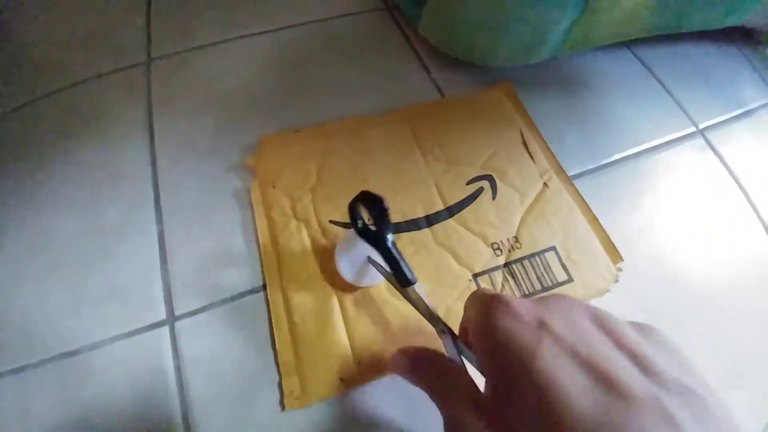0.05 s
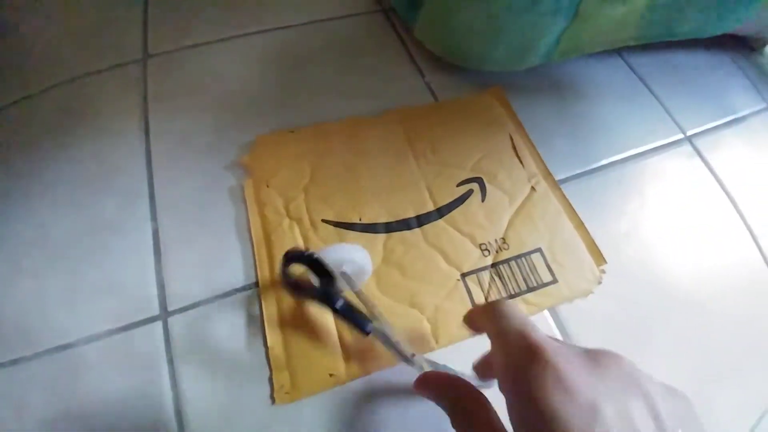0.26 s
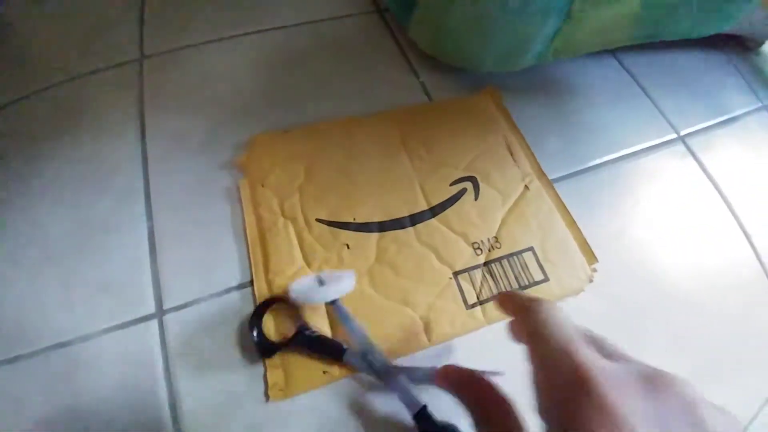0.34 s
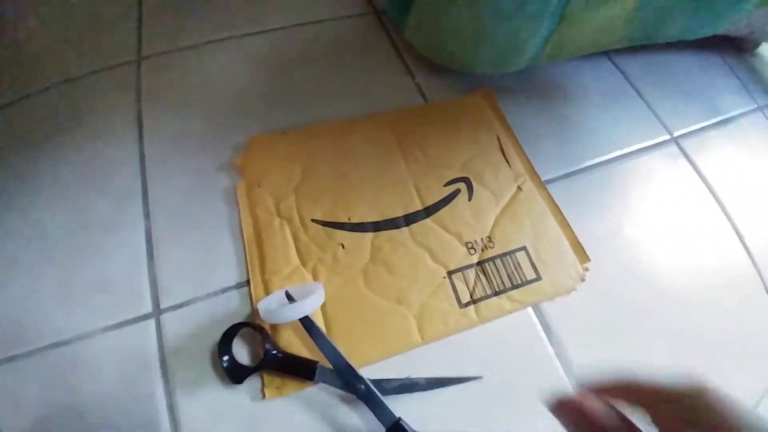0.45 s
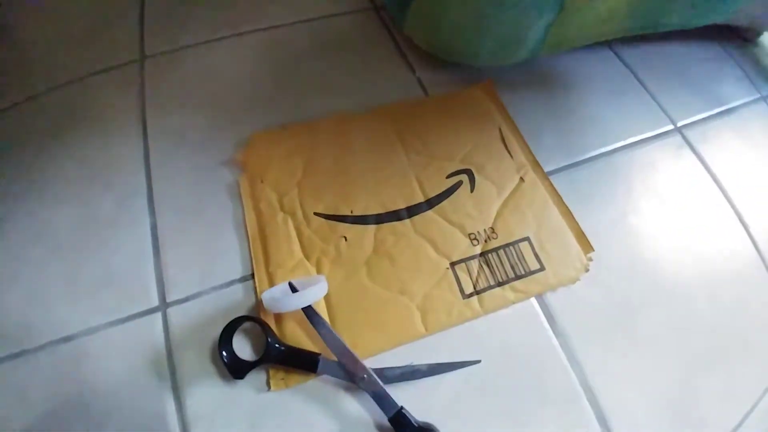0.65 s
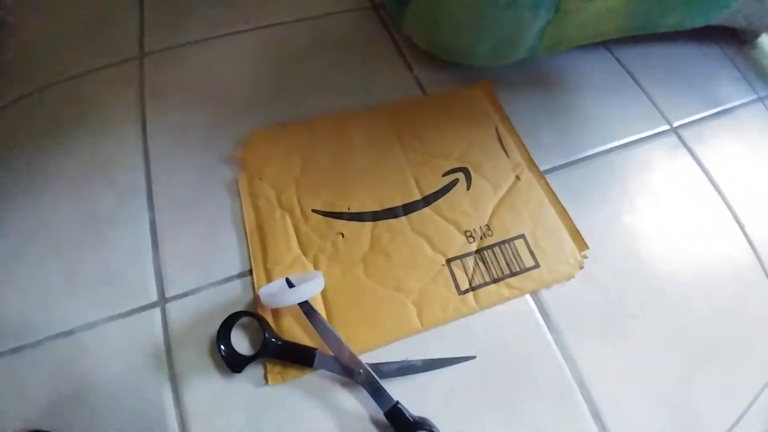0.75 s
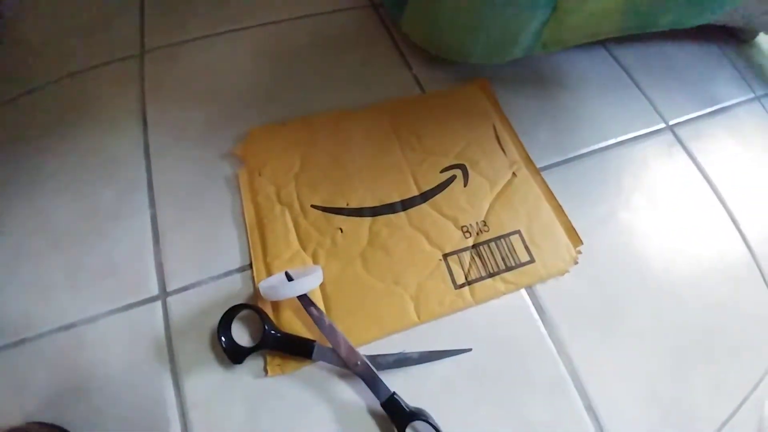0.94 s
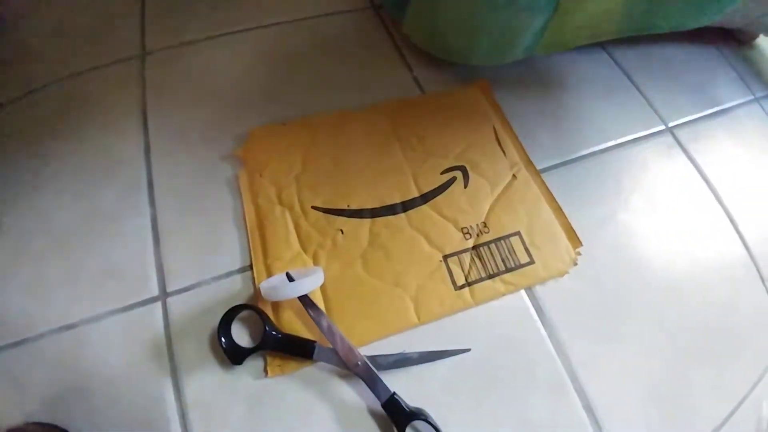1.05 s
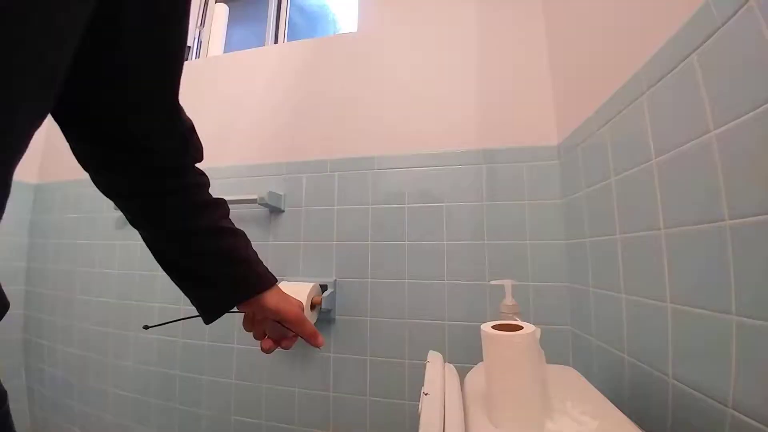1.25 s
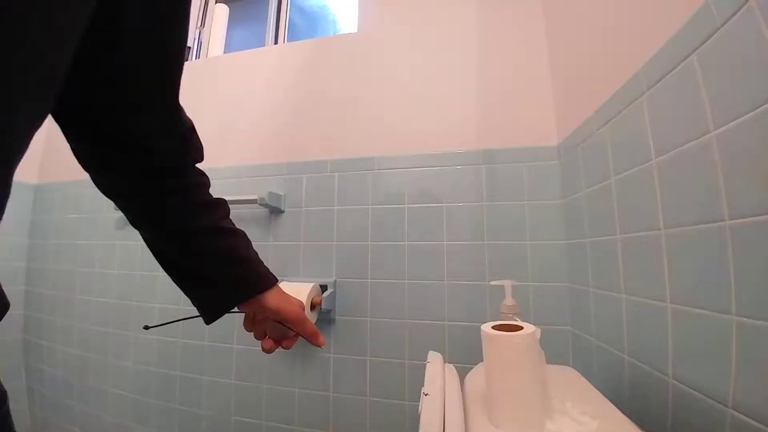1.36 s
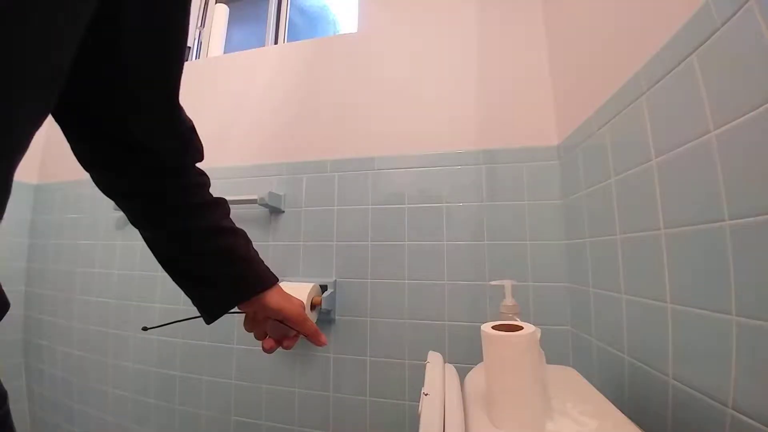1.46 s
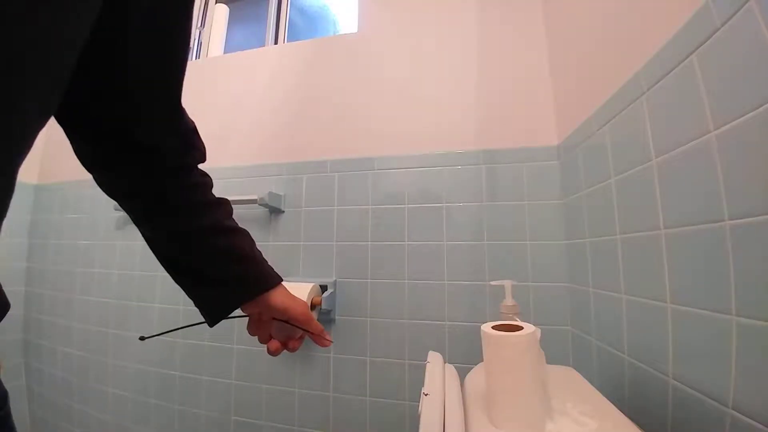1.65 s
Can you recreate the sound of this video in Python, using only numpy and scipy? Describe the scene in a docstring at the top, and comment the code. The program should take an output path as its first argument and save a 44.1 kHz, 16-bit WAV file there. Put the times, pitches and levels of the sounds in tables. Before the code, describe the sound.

Steel scissors fall in a small room: a quick sliding rustle, a plastic handle knocking on a padded mailer, then a bright, ringing clatter on tile with two low thumps. Faint clicks and a low hum follow.

```python
"""In a small, hard room, steel scissors slip from a hand, knock on a padded mailer and hit floor tiles.
They rustle as they slide, the plastic handles knock, and they land with two dull, low thumps.
Each hit of the clatter is a short crack plus the ringing of the blades, and the room echoes it.
Faint clicks, hiss and a low hum lie underneath; the hum cuts out briefly, then falls away near the end."""
import sys
import numpy as np
from scipy import signal
from scipy.fft import rfft, irfft, next_fast_len
from scipy.io import wavfile
from scipy.ndimage import uniform_filter1d

SR = 44100
rng = np.random.default_rng(int(sys.argv[2]) if len(sys.argv) > 2 else 0)


def wav_out(sig):
    """Save sig, one row per channel (or a flat mono array), as 16-bit PCM at SR to the path in sys.argv[1]."""
    wavfile.write(sys.argv[1], SR, np.round(np.clip(np.atleast_2d(sig).T, -1, 1) * 32767).astype(np.int16))


N = 74970
T = np.arange(N) / SR
ALIKE_HZ = 1690  # left and right sound much alike below this


def amp(db):
    """Turn decibels into a number to multiply by."""
    return 10 ** (np.asarray(db) / 20)

def unit(x):
    """Scale a sound to an average (rms) strength of 1."""
    return x / np.sqrt(np.mean(x ** 2))

def over_hz(points, f):
    """Read a table at frequency f, spacing octaves evenly."""
    hz, values = np.array(points, float).T
    return np.interp(np.log(np.maximum(f, 1)), np.log(hz), values)

def over_time(points):
    """Turn rows of t/s, level/dB into a volume curve."""
    return amp(np.interp(T, *np.array(points).T))

def colour(x, points):
    """Make some frequencies louder and others softer, following rows of f/Hz, level/dB."""
    n = next_fast_len(x.shape[-1]) * 2
    gain = amp(over_hz(points, np.arange(n // 2 + 1) * SR / n))
    cepstrum = irfft(np.log(gain), n)
    cepstrum[1:n // 2] *= 2  # folded in half so nothing sounds before its cause
    cepstrum[n // 2 + 1:] = 0
    return irfft(rfft(x, n) * np.exp(rfft(cepstrum)), n)[..., :x.shape[-1]]

def noise(n):
    """Left and right noise, alike in the bass and unrelated in the treble."""
    mid, side = rfft(rng.standard_normal((2, n)))
    f = np.arange(len(mid)) * SR / n
    alike = .78 / (1 + (f / ALIKE_HZ) ** 2)
    return unit(irfft(mid * np.sqrt(1 + alike) + np.array([[1], [-1]]) * side * np.sqrt(1 - alike), n))

def wander(per_second):
    """Glide from one random value to the next."""
    hold = max(int(SR / per_second), 1)
    steps = np.repeat(rng.standard_normal(N // hold + 1), hold)
    return unit(uniform_filter1d(steps, hold)[:N])

def add(out, x, start):
    """Mix a sound in at its start time, in seconds."""
    i = int(start * SR)
    out[:, i:i + x.shape[-1]] += x[:, :N - i]

def struck(tone, decay_s, notes=(), ring_db=0, ring_s=1):
    """One hit: a burst of noise, plus any ringing notes, which fade by 60 dB in ring_s."""
    t = T[:SR // 4]
    burst = (1 - np.exp(-t / (.15 * decay_s))) * np.exp(-t / decay_s)
    sound = unit(colour(noise(len(t)) * burst, tone))
    if notes:
        phases = rng.uniform(0, 2 * np.pi, (len(notes), 2, 1))
        detune = 1 + np.outer(.0023 * rng.standard_normal(len(notes)), [1, 0])  # pitches vary per hit
        ring = sum(amp(db) * np.sin(2 * np.pi * hz * t + phase * (hz > ALIKE_HZ))
                   for (hz, db), phase in zip(notes * detune, phases))
        sound = sound + amp(ring_db) * unit(ring * np.exp(-np.log(1000) * t / ring_s))
    return sound * np.sqrt(decay_s * SR / len(t) / 2)


# how loud the hum and rumble are together: t/s, level/dB
LOW_LEVEL = [(0, -48), (.35, -51), (.67, -45), (.74, -50.5), (.92, -47.5), (1.12, -45.5), (1.188, -43.5),
             (1.194, -57), (1.229, -58), (1.236, -43.5), (1.33, -46.5), (1.348, -65), (1.7, -80.5)]
# the notes of the hum: f/Hz, level/dB relative to LOW_LEVEL
HUM_NOTES = [(54.5, -7.5), (82, -5.5), (109, -10), (163, -13.5)]
# the deep tone of the rumble: f/Hz, level/dB
RUMBLE_TONE = [(25, -18.5), (55, -5.5), (105, 4.5), (135, -7), (180, -7), (230, -9.5), (600, -14),
               (1000, -31), (4000, -63.5)]
# the tone of the hiss: f/Hz, level/dB
HISS_TONE = [(500, 9.5), (1500, -5.5), (9000, -10), (10700, 8.5), (12000, -12), (16000, -15)]
def background():
    """A wavering hum in a low rumble, over faint steady hiss."""
    hum = sum(amp(db) * np.sqrt(2) * (1 + wander(13)) * np.sin(2 * np.pi * hz * T + wander(7))
              for hz, db in HUM_NOTES)
    rumble = amp(-3) * unit(colour(noise(N), RUMBLE_TONE))
    hiss = amp(-74) * unit(colour(noise(N), HISS_TONE))
    return over_time(LOW_LEVEL) * (hum + rumble) + hiss

# how long the echo takes to fade by 60 dB: f/Hz, t/s
ECHO_FADE = [(1000, 0.19), (7000, 0.21), (14000, 0.2)]
def room_echo(x):
    """Sound bounces off the hard walls so often that it blurs into a short tail."""
    n = SR // 2
    t, f = T[:n], np.arange(n // 2 + 1) * SR / n
    spectrum = rfft(noise(n))
    edges_hz = [0, 500, 1500, 4000, 9000, SR]
    tail = np.zeros((2, n))
    for low, high in zip(edges_hz, edges_hz[1:]):
        band = irfft(spectrum * ((f >= low) & (f < high)), n)
        tail += band * np.exp(-np.log(1000) * t / over_hz(ECHO_FADE, (low + high) / 2))
    delay_s, build_s = .0044, .0033
    tail = unit(tail * np.clip((t - delay_s) / build_s, 0, 1)) / np.sqrt(n)
    return amp(-13) * signal.fftconvolve(x, tail, axes=1)[:, :N]

# how loud the sliding is: t/s, level/dB
RUSTLE_LEVEL = [(0, -48), (.03, -44.5), (.055, -34.5), (.085, -50), (.105, -56), (.16, -56.5), (.19, -47.5),
                (.25, -63), (.7, -68), (1.3, -69), (1.5, -81.5)]
# the tone of the sliding: f/Hz, level/dB
RUSTLE_TONE = [(100, -9.5), (600, 2), (2000, 0), (4500, -6), (7200, 1.5), (9000, -7), (10500, -3),
               (15000, -19.5)]
def rustle():
    """Scissors and paper slide with a grainy noise, loudest as the scissors leave the hand."""
    grains = noise(N) * amp(2.5 * wander(460))
    return over_time(RUSTLE_LEVEL) * unit(colour(grains, RUSTLE_TONE))

# faint clicks: t/s, level/dB, f/Hz
CLICKS = [(0.067, -27.5, 6500), (0.085, -26.5, 6940), (0.1532, -28.5, 6550), (0.326, -50, 6800),
          (0.3483, -46.5, 6560), (0.895, -47.5, 5910), (0.9854, -51, 2413), (1.082, -45, 2250),
          (1.1005, -43, 7260), (1.192, -52, 1900), (1.23, -51.5, 1496), (1.2551, -50.5, 4120),
          (1.2762, -51.5, 7660)]
def clicks():
    """Faint pitched clicks; two of them come where the hum cuts out (1.192 s) and comes back (1.23 s)."""
    out = np.zeros((2, N))
    for start, db, hz in CLICKS:
        tone = [(200, -30), (hz / 1.35, -12.5), (hz, 0), (hz * 1.35, -12.5), (15000, -32)]
        click = struck(tone, decay_s=.001, notes=[(hz, 0)], ring_db=-10.5, ring_s=.025)
        add(out, amp(db) * click, start)
    return out

# thumps of the landing: t/s, level/dB
THUDS = [(0.478, -33), (0.509, -32.5)]
# the deep tone of a thump: f/Hz, level/dB
THUD_TONE = [(25, -12), (60, 10.5), (130, -6.5), (350, -15.5), (800, -15), (2000, -47)]
def landing_thuds():
    """Two dull, low thumps as the scissors land."""
    out = np.zeros((2, N))
    for start, db in THUDS:
        add(out, amp(db) * struck(THUD_TONE, decay_s=.024), start)
    return out

# handles hitting the mailer: t/s, level/dB
KNOCKS = [(0.0469, -23.5), (0.176, -39.5), (0.2064, -10), (0.2137, -16.5), (0.382, -22)]
# the tone of a knock: f/Hz, level/dB
KNOCK_TONE = [(170, -39.5), (620, 0), (1000, 0), (1500, 2.5), (2400, 1), (4700, -3), (7500, -2),
              (8900, -21.5), (11000, -12), (15500, -28.5)]
# the notes the handles ring at: f/Hz, level/dB
HANDLE_NOTES = [(710, -14), (790, -7.5), (1283, -2), (1420, -2.5), (1650, -1), (3267, 1.5), (4440, -5.5),
                (6030, 2), (6228, -5)]
def handle_knocks():
    """The plastic handles hit the mailer and give a short, hollow ring."""
    out = np.zeros((2, N))
    for start, db in KNOCKS:
        knock = struck(KNOCK_TONE, decay_s=.0022, notes=HANDLE_NOTES, ring_db=-3, ring_s=.055)
        add(out, amp(db) * knock, start)
    return out

# steel hits: t/s, level/dB, bass/dB, middle/dB, treble/dB, crack decay/s, ring/dB relative to the crack
BLADE_HITS = [(0.3814, -8, -3, -5.5, -3, 0.0028, -5), (0.4013, -13, 1, -5.5, -0.5, 0.0045, -3.5),
              (0.4139, -19.5, 0.5, -8, -4, 0.0044, -4.5), (0.425, -12, -15, -13, -3.5, 0.004, 2),
              (0.4353, -18.5, -5, -7, 0.5, 0.0074, 0), (0.4545, -23.5, -1.5, -1, -5.5, 0.0083, -7.5),
              (0.477, -4.5, -1, -2, -2, .008, -9), (0.4913, -9.5, -5.5, 5, 4, 0.0089, -9),
              (0.505, -12, 3, -1.5, -6, 0.0078, -12.5), (0.5115, -12.5, 3, 4.5, 3, 0.006, -4),
              (0.535, -12, 3.5, 6, -7, 0.0036, -8.5), (0.5432, -21, 2.5, 3, -8.5, 0.0089, -6),
              (0.5559, -16.5, 2, 1, -8, 0.0044, -7.5), (0.576, -30, 9.5, 9.5, -1, 0.0045, -12)]
# the bright tone of a crack: f/Hz, level/dB
CRACK_TONE = [(80, -34.5), (330, -31.5), (600, -8), (1100, -12), (1800, -10.5), (2900, -4), (3700, -9),
              (4600, -1.5), (5300, -3), (6300, 6), (7600, -2), (8800, -9.5), (9900, -4), (11600, -8.5),
              (12700, -15.5), (15500, -13)]
# the notes the blades ring at: f/Hz, level/dB
BLADE_NOTES = [(540, -12.5), (1850, -10), (2985, -3.5), (4232, -6), (4722, -5), (4792, -4), (5894, -4.5),
               (6360, -1), (6435, -1), (6765, -6), (7225, -7.5), (7510, -1.5), (10010, -7.5), (11558, -4.5)]
def blade_clatter():
    """Steel hits tile and blade hits blade; each hit cracks and sets the blades ringing."""
    out = np.zeros((2, N))
    for start, db, bass, middle, treble, decay_s, ring_db in BLADE_HITS:
        hit = struck(CRACK_TONE, decay_s, BLADE_NOTES, ring_db, ring_s=.095)
        tone = [(1800, bass), (2700, middle), (4600, middle), (5800, .001), (7800, .016), (10000, treble)]
        add(out, amp(db) * colour(hit, tone), start)
    return out

# how much louder the microphone's left opening hears than its right: f/Hz, level/dB
LEFT_OVER_RIGHT = [(900, -1.5), (1700, 3.5), (2900, -3), (4000, -6), (5200, 3.5), (7200, 10.5), (8500, 5),
                   (9800, -19.5), (15000, -6)]
def scene():
    """Knocks, clatter, clicks and their echo differ in tone left and right; the rest joins them."""
    hits = handle_knocks() + blade_clatter() + clicks()
    in_room = hits + room_echo(hits)
    left = colour(in_room[0], [(hz, db / 2) for hz, db in LEFT_OVER_RIGHT])
    right = colour(in_room[1], [(hz, -db / 2) for hz, db in LEFT_OVER_RIGHT])
    return np.array([left, right]) + landing_thuds() + rustle() + background()

def record(dry):
    """The microphone misses one narrow band; the recorder clips at full scale and cuts the top treble."""
    deaf_hz, top_hz = 8895, 15750
    heard = signal.lfilter(*signal.iirnotch(deaf_hz, Q=9.8, fs=SR), dry)
    treble_cut = signal.ellip(8, .2, 70, top_hz, fs=SR, output="sos")
    return signal.sosfilt(treble_cut, np.clip(heard, -1, 1))


dry = scene()
out = record(dry)
wav_out(out)
```